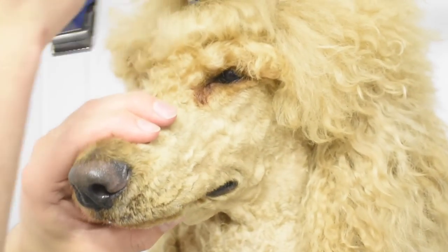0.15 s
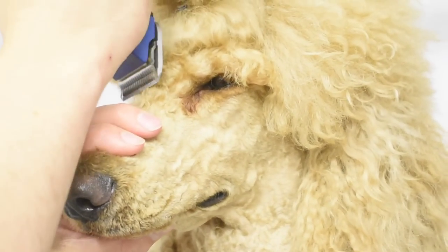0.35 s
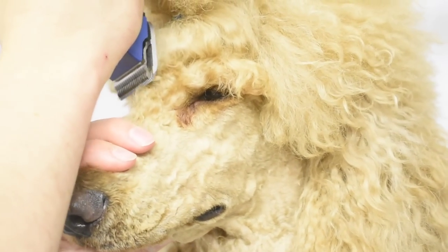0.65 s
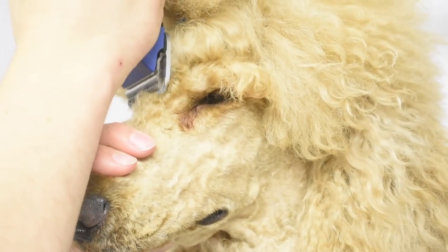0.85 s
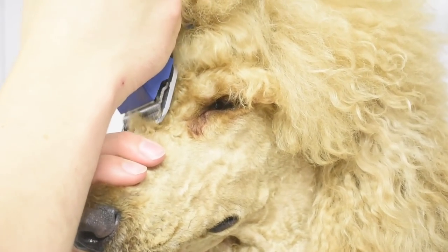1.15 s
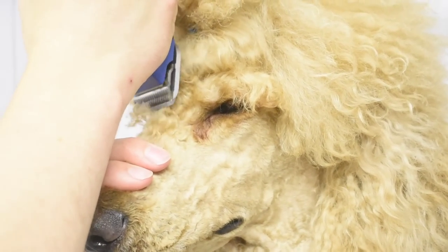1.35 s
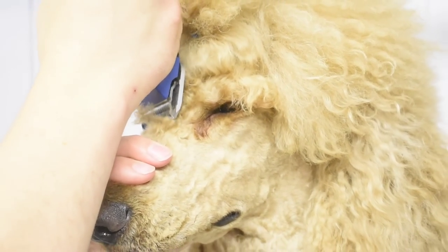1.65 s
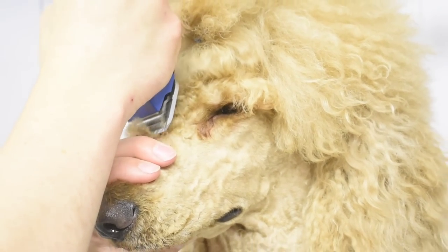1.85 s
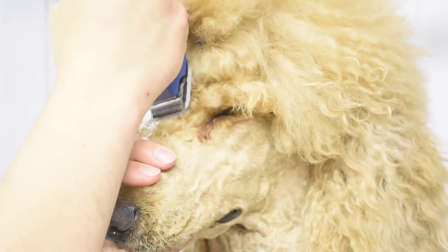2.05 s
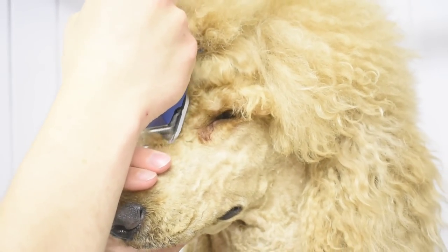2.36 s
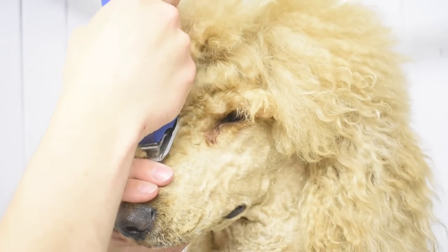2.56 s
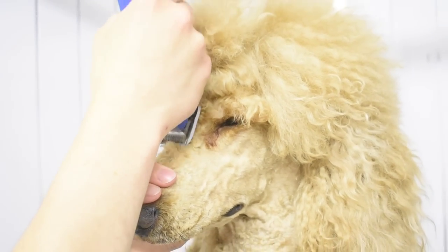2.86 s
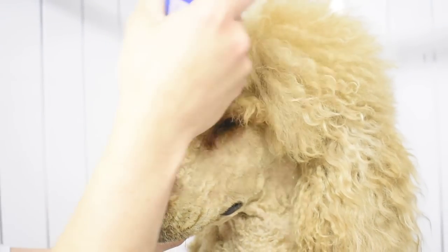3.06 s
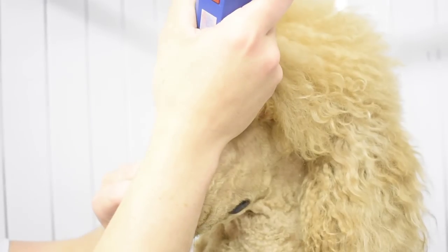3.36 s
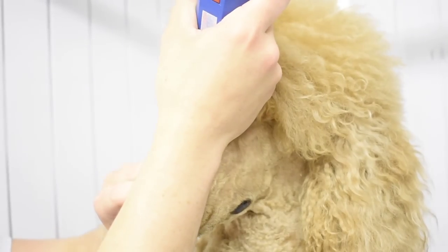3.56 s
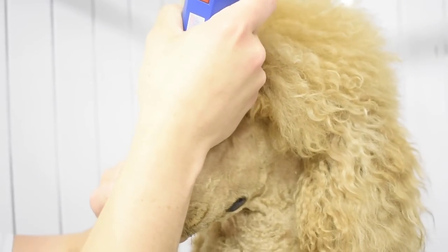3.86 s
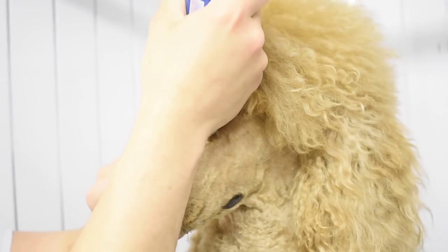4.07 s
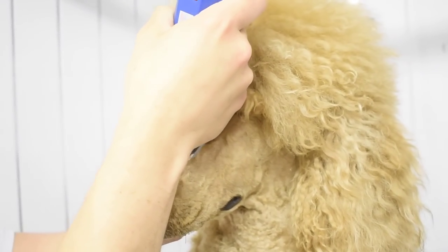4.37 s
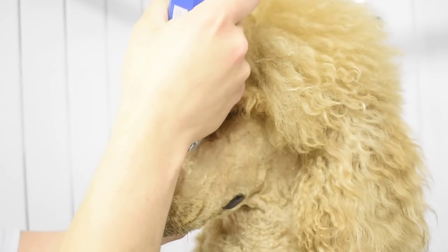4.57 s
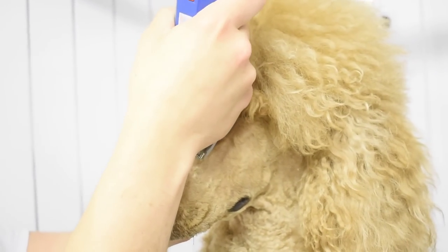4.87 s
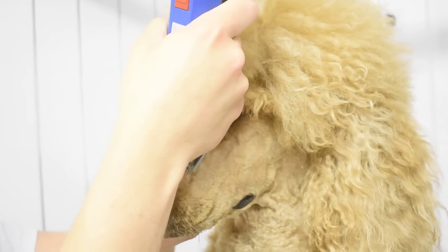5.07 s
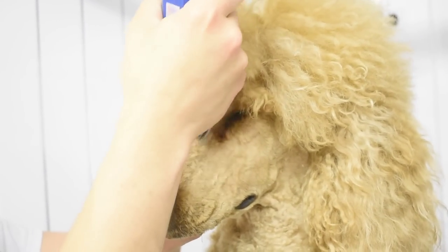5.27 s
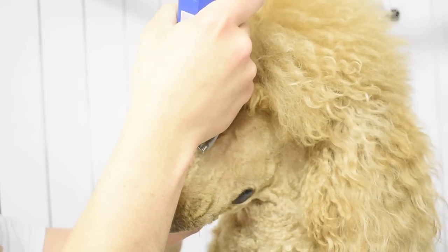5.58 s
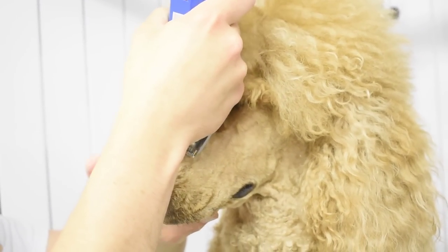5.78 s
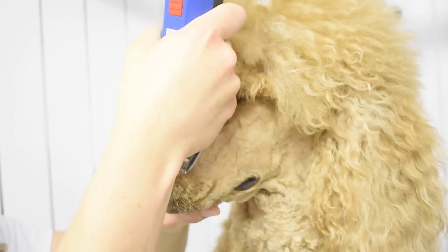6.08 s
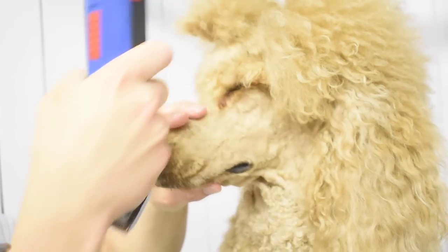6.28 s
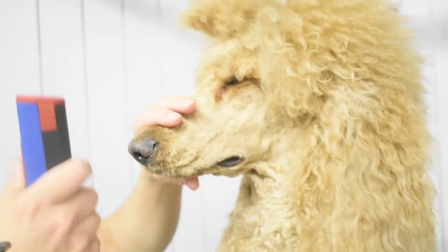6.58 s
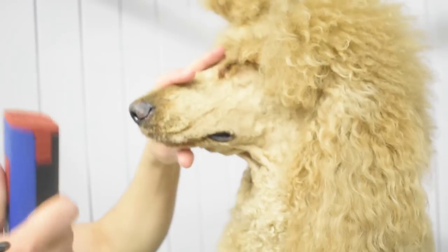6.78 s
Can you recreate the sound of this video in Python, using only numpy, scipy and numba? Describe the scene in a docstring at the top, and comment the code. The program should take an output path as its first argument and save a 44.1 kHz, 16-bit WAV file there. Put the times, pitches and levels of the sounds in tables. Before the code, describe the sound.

Steady harsh clipper buzz shifts slightly in colour as it trims a dog's fur, loosens when lifted away, and quickly stops, leaving faint room air.

```python
"""Cordless clippers trim a dog's face in a small bare room, are lifted away and switched off.
Each stroke is a train of impacts that excites the resonances of the plastic case; steel ticks, blade friction
and gear harmonics are added. The colour follows the grip: held free, at the brow or along the muzzle.
Near the start something bumps, probably the grooming table: damped modes, a noise rattle and a crack.
Behind lie steady room air and a soft low rumble, both filtered noise."""
import sys
import numpy as np
from scipy import signal
from scipy.fft import rfft, irfft
from scipy.io import wavfile
from scipy.ndimage import uniform_filter1d, map_coordinates
from numba import njit

SR = 44100
rng = np.random.default_rng(int(sys.argv[2]) if len(sys.argv) > 2 else 0)


def master_out(mix):
    """Clip the mix to full scale and print it as 16-bit PCM to the path in sys.argv[1]."""
    frames = np.transpose(np.atleast_2d(mix))
    ceiling = np.clip(frames, -1, 1)
    pcm = np.round(ceiling * 32767).astype(np.int16)
    wavfile.write(sys.argv[1], SR, pcm)


N = 305416
TIME = np.arange(N) / SR   # s
GEAR_RATIO = 9 / 11   # turns of the slow gear per turn of the crank; one crank turn is one blade stroke
# Contacts within one stroke. Each row: place as a share of the turn, relative level in dB of the knock
# on the case, relative level in dB of the steel tick.
CONTACTS = [(.004, -0.5, 7), (0.056, -17.5, -6), (0.128, -11, -7), (0.217, -8.5, 1.5), (0.287, -10.5, -7),
            (0.346, -10, 2), (0.504, -5.5, -17), (0.561, -6.5, -1.5), (0.692, -11, -22), (.78, -3.5, -30)]


def from_db(db):
    """Level to amplitude: 20 dB is a factor of ten."""
    return 10 ** (np.asarray(db) / 20)


def rms_one(x):
    """Normalise the effective (root-mean-square) value to 1."""
    return x / np.sqrt(np.mean(x ** 2) + 1e-20)


def steady(x):
    """Automatic levelling: divide by the effective value averaged over about four strokes."""
    power = uniform_filter1d(x ** 2, size=4300)
    return x / np.sqrt(power + .03 * power.mean())


def in_time(rows):
    """Linear interpolation of every column of a time curve at each sample."""
    s, *columns = np.transpose(rows)
    return [np.interp(TIME, s, column) for column in columns]


def at_hz(points, hz):
    """Interpolation of a spectrum along a logarithmic frequency axis."""
    known_hz, values = np.transpose(points)
    return np.interp(np.log(np.maximum(hz, 1)), np.log(known_hz), values)


def by_pose(values, poses):
    """Power-weighted mean of one value per pose (free, brow, muzzle) as the grip changes."""
    return np.dot(values, poses ** 2) / np.sum(poses ** 2, axis=0)


def drift(rate):
    """Smooth random motion: a cubic spline through `rate` normal deviates a second."""
    coarse = TIME[::256]
    points = rng.standard_normal(500)
    return np.interp(TIME, coarse, map_coordinates(points, [coarse * rate + 2], order=3, mode="wrap"))


def band(x, low_hz, high_hz):
    """Butterworth band-pass: a maximally flat passband."""
    edges_hz = [low_hz, min(high_hz, .45 * SR)]
    return signal.sosfilt(signal.butter(2, edges_hz, "band", fs=SR, output="sos"), x)


def colour(x, spectrum, size=4096):
    """Minimum-phase filtering: folding the cepstrum makes the given spectrum causal."""
    level_db = at_hz(spectrum, np.fft.rfftfreq(size, 1 / SR))
    cepstrum = irfft(np.log(from_db(level_db)))
    cepstrum[1:size // 2] *= 2
    cepstrum[size // 2 + 1:] = 0
    return signal.oaconvolve(x, irfft(np.exp(rfft(cepstrum))))[:N]


def resonate(x, hz, width_hz, lift_db):
    """Two-pole resonance added in parallel, which lifts (or lowers) one band."""
    return x + (from_db(lift_db) - 1) * signal.lfilter(*signal.iirpeak(hz, hz / width_hz, fs=SR), x)


def ring(x, hz, t60):
    """Damped free vibration: a unit click starts a sine of height 1 that falls 60 dB in t60 seconds."""
    r = .001 ** (1 / (t60 * SR))
    w = 2 * np.pi * hz / SR
    return signal.lfilter([0, np.sin(w)], [1, -2 * r * np.cos(w), r * r], x + 1e-18)


def clicks(times, sizes):
    """Band-limited impulses: a short windowed sinc places each one between samples."""
    at = np.ravel(times)[:, None] * SR
    taps = np.floor(at).astype(int) + np.arange(-3, 5)
    shape = np.sinc(taps - at) * np.sinc((taps - at) / 4)
    inside = (taps >= 0) & (taps < N)
    return np.bincount(taps[inside], (np.ravel(sizes)[:, None] * shape)[inside], N)


def tone(turns, level_db, waver_db, wander):
    """A partial with slow amplitude and phase modulation as the hand moves; wander in radians."""
    amplitude = np.sqrt(2) * from_db(level_db + waver_db * drift(6))
    return amplitude * np.cos(2 * np.pi * turns + wander * drift(9))


def room(x, wet_db):
    """Diffuse reverberation: decaying noise, band by band, joins the direct sound and power is kept."""
    # Each row: frequency in Hz, reverberation time (60 dB decay) in seconds.
    decay_times = [(100, 0.82), (500, 0.68), (3000, 0.4), (8000, 0.45), (16000, 0.079)]
    t = TIME[:SR // 2]
    edges_hz = np.geomspace(50, 18000, num=10)
    tail = 0
    for low_hz, high_hz in zip(edges_hz, edges_hz[1:]):
        decay_db = -60 * t / at_hz(decay_times, np.sqrt(low_hz * high_hz))
        tail = tail + band(rng.standard_normal(len(t)), low_hz, high_hz) * from_db(decay_db)
    tail = tail * np.clip(t / 0.0025 - 1, 0, 1)   # silent for 2.5 ms, then fading in over 2.5 ms
    wet = from_db(wet_db)
    return (x + wet * signal.oaconvolve(x, tail / np.linalg.norm(tail))[:N]) / np.hypot(1, wet)


def room_air():
    """Stationary broadband noise: white noise shaped by a fixed spectrum."""
    # Each row: frequency in Hz, relative spectral density in dB per Hz.
    air_spectrum = [(20, -22), (45, -23), (85, -2), (120, -3), (160, 2), (200, -5.5), (280, -4.5),
                    (450, -4.5), (1000, -0.5), (4000, -20), (16000, -42)]
    return from_db(-55.5) * rms_one(colour(rng.standard_normal(N), air_spectrum))


def low_rumble(floor_db=-62):
    """Amplitude-modulated narrow-band noise: the powers of a floor and of Gaussian swells add."""
    # Each row: time of the top in seconds, half length in seconds (fall to 1/e in power), level in dB.
    swells = [(1.871, 0.39, -52.5), (4.27, 0.18, -50), (4.967, 0.09, -54), (6.65, 0.24, -55.5)]
    power = from_db(floor_db) ** 2
    for s, half_s, db in swells:
        power = power + from_db(db) ** 2 * np.exp(-((TIME - s) / half_s) ** 2)
    return np.sqrt(power) * rms_one(band(rng.standard_normal(N), 242, 360))


def table_bump(rattle_db=-20, rattle_s=0.046):
    """Modal excitation: a sharp crack sets the modes of a hollow board booming, and it rattles."""
    # Each row: start in seconds, level in dB of the thud, level in dB of the crack before filtering.
    bumps = [(0.2113, -27, 1), (0.2276, -21.5, -7)]
    # Modes of the table. Each row: frequency in Hz, relative level in dB, 60 dB decay time in seconds.
    modes = [(84.5, -15.5, 1), (160.4, -6, 0.27), (220, 0, 0.44), (237, 1.5, 0.32), (315, -6.5, 0.2),
             (344, -4, 0.21), (402, -1, 0.41), (556, -8, 0.3), (712, -2, 0.24)]
    # Rattle of the table top. Each row: frequency in Hz, relative spectral density in dB per Hz.
    thud_spectrum = [(30, -23), (70, -25), (120, -13), (220, -1), (400, 1.5), (520, -12), (750, -11),
                     (1400, -7), (4000, -56)]
    s, thud_db, crack_db = np.transpose(bumps)
    blows = clicks(s, from_db(thud_db))
    boom = 0
    for k, (hz, db, t60) in enumerate(modes):
        boom = boom + (-1) ** k * from_db(db) * ring(blows, hz, t60)   # modes alternate in sign
    age = np.maximum(TIME - s[0], 0)
    envelope = np.exp(-age / rattle_s) * (1 - np.exp(-age / 0.0019))
    rattle = rms_one(colour(rng.standard_normal(N), thud_spectrum)) * envelope
    crack = 2 * band(clicks(s, from_db(crack_db)), 1500, 9700)
    return band(boom, 118, 4000) + from_db(rattle_db) * rattle + crack


def gear_whine(turns, poses, clatter_db, whine_db=0.56):
    """Gear-mesh harmonics: tones at multiples of the crank and slow-gear speeds follow pose and strain."""
    # Each row: multiple of the crank's speed, relative level in dB held free, at the brow and along the
    # muzzle, dB gained per dB of clatter, waver in dB, phase wander in radians.
    gear_tones = [(14 * GEAR_RATIO, -56, -54, -54, 0, .5, .1),
                  (42 * GEAR_RATIO, -47, -46, -41, -.4, 2.2, .7), (84, -40.5, -44, -39.5, 1.7, 2.6, 1.0),
                  (126, -45, -43, -42, .8, 2.2, 2)]
    strain_db = clatter_db - clatter_db.mean()
    whine = 0
    for multiple, *levels_db, follows, waver_db, wander in gear_tones:
        level_db = whine_db + by_pose(levels_db, poses) + follows * strain_db
        whine = whine + tone(multiple * turns, level_db, waver_db, wander)
    return whine


def blade_slide(turns, clatter_db, throb_db=1.66):
    """Friction noise: the blade rubs over its comb and through the fur, in two puffs a stroke."""
    # Each row: frequency in Hz, relative spectral density in dB per Hz.
    slide_spectrum = [(150, -28.5), (400, -20), (620, -4), (1000, -4.5), (2300, 5), (4500, -0.5),
                      (6000, -5), (8500, -8), (12000, -12.5), (16000, -27.5)]
    rub = rng.standard_normal(N) * from_db(throb_db * np.cos(4 * np.pi * (turns - .07)))
    return from_db(clatter_db - 3.5) * rms_one(colour(rub, slide_spectrum))


def end_stops(turns, clatter_db, snap_s=0.00029, uneven_db=2.5):
    """Backlash impact: the drive peg snaps across its slot each time the blade reverses."""
    reversals = np.arange(580) / 2 + .004   # in turns, two a stroke
    times = np.interp(reversals, turns, TIME, left=-1, right=-1)
    blows = clicks(times, from_db(uneven_db * rng.uniform(-0.76, 1, len(times))))
    envelope = signal.lfilter([1], [1, -np.exp(-1 / (snap_s * SR))], blows + 1e-18)
    snaps = envelope * rng.standard_normal(N)
    return from_db(clatter_db - 8.5) * rms_one(band(snaps, 3400, 5200))


def contact_times(turns, jitter_s):
    """Kinematics of the crank: when each contact falls (strokes x contacts), and its angle in turns."""
    angle = np.arange(-1, 290)[:, None] + np.array(CONTACTS)[:, 0]
    times = np.interp(angle, turns, TIME, left=-1, right=-1)
    return times + jitter_s * rng.standard_normal(angle.shape), angle


def tick_force(ring_db, clatter_db, free):
    """Impact level grows with vibration: the harder the clippers rattle, the harder the ticks, in dB."""
    usual_db, per_ring, per_clatter = -36, 0.72, 0.89   # dB; dB gained per dB of case ring and of clatter
    free_db = -2   # with no fur between the teeth they tick more softly
    rattle_db = per_ring * (ring_db - ring_db.mean()) + per_clatter * (clatter_db - clatter_db.mean())
    return usual_db + rattle_db + free_db * free


def blade_ticks(turns, force_db, beat_db=8.5, worst_turn=0.8, uneven_db=3.0, jitter_s=.00008,
                scrape_s=0.00035, sizzle_s=0.0013, sizzle_db=-15):
    """Beating of two rotations: steel strikes hardest when crank and slow gear align, some 7 times a second."""
    # Each row: frequency in Hz, relative spectral density in dB per Hz.
    tick_spectrum = [(2000, -28), (4000, 1), (6500, 0), (8500, -1), (10000, 2.5), (13000, 2), (16000, -12)]
    times, angle = contact_times(turns, jitter_s)
    lined_up = np.cos(2 * np.pi * (angle * (1 - GEAR_RATIO) + worst_turn - .25))
    chance_db = uneven_db * rng.standard_normal(times.shape)
    sizes = from_db(np.array(CONTACTS)[:, 2] + beat_db * lined_up + chance_db)
    # each tick is a brief scrape of the teeth with a short sizzle after it
    age = TIME[:SR // 32]
    shape = np.exp(-age / scrape_s) + from_db(sizzle_db) * np.exp(-age / sizzle_s)
    scrape = signal.oaconvolve(clicks(times, sizes), shape)[:N] * rng.standard_normal(N)
    return from_db(force_db) * rms_one(colour(scrape, tick_spectrum))


def case_tones(turns, poses, ring_db, lag_turn=0.0609):
    """Phase-locked harmonics: the shell's partials peak together just after the knocks, in bursts."""
    # Each row: multiple of the stroke rate, relative level in dB held free, at the brow, along the muzzle.
    singing = [(10, -66, -62, -60), (13, -58, -59, -62), (15, -79, -60, -58), (26, -74, -57, -55),
               (28, -63, -59, -52), (31, -54, -54, -55), (38, -49, -48, -46), (40, -40, -43, -46),
               (42, -34, -42, -43), (44, -47, -40, -51), (48, -53, -47, -41), (50, -46, -33, -45),
               (51, -56, -38, -41), (52, -49, -37, -41), (53, -54, -44, -38), (54, -46, -33, -39),
               (55, -51, -45, -44), (56, -42, -48, -39), (57, -58, -43, -35), (58, -41, -47, -38),
               (59, -43, -39, -34), (60, -45, -40, -38), (61, -40, -38, -36), (62, -44, -40, -38),
               (65, -49, -40, -36), (69, -41, -43, -45), (71, -43, -41, -43), (73, -48, -40, -45),
               (75, -44, -42, -58)]
    tones = 0
    for multiple, *levels_db in singing:
        level_db = by_pose(levels_db, poses)
        tones = tones + tone(multiple * (turns - lag_turn), level_db, waver_db=2.0, wander=.4)
    return tones * from_db(.8 * (ring_db - np.median(ring_db)) - .6)


def disperse(x, width_hz=380):
    """Dispersion of bending waves in the shell: all-pass filters smear each knock around 2 kHz."""
    for hz in np.geomspace(1800, 2500, num=3):
        x = x - 2 * signal.lfilter(*signal.iirpeak(hz, hz / width_hz, fs=SR), x)
    return x


def case_rattle(turns, poses, ring_db, clatter_db, jitter_s=.000024, loose_s=.00005, uneven_db=1.6):
    """Forced resonance: near-periodic knocks ring the plastic case; an unloaded blade chatters loosely."""
    # Broad colour of the knocks. Each row: frequency in Hz, relative spectral density in dB per Hz.
    case_spectrum = [(130, -44), (300, -17), (600, -26), (1000, -22), (1450, -9), (2000, -7.5),
                     (3000, -0.5), (4000, -1.5), (5000, -8.5), (5900, -18), (8000, -10), (10000, -21.5),
                     (13000, -30), (16000, -30.5)]
    # Each row: frequency in Hz, width in Hz, lift in dB held free, at the brow and along the muzzle.
    resonances = [(847, 63, 20, 15, 12.5), (1080, 180, -9, 10.5, 0), (1690, 140, 10, -4, 0.5),
                  (2090, 133, -2.5, 13, 6), (2434, 91, -2, 7.5, 17), (2784, 700, 2, 9, 4),
                  (3380, 290, 8.5, -2.5, 5.5), (3930, 280, 1, 3.5, 6), (4780, 250, 7, 9.5, -2),
                  (5250, 204, 14.5, 10, 12.5), (6830, 410, 12.5, 6.5, 7), (8300, 2300, 9, 9.5, 3.5)]
    times, _ = contact_times(turns, jitter_s)
    looseness_s = loose_s * np.interp(times, TIME, poses[0])
    times = times + looseness_s * rng.standard_normal(times.shape)
    sizes_db = np.array(CONTACTS)[:, 1] + uneven_db * rng.standard_normal(times.shape)
    knocks = disperse(colour(clicks(times, from_db(sizes_db)), case_spectrum))
    rattle = 0
    for k, share in enumerate(poses):
        voiced = room(knocks, wet_db=3)   # every pose has its own paths through the room
        for hz, width_hz, *lifts_db in resonances:
            voiced = resonate(voiced, hz, width_hz, lifts_db[k])
        rattle = rattle + share * rms_one(voiced)
    # the main ring around 2.3 kHz and the clatter that remains are levelled apart
    main = signal.lfilter(*signal.iirpeak(2330, 2.5, fs=SR), rattle)
    clatter = steady(rattle - main) * from_db(clatter_db - 2.5)
    return steady(main) * from_db(ring_db - 3.0 + 5.6 * poses[0]) + clatter


@njit
def moving_band(x, w, damping):
    """State-variable band-pass whose centre w (radians per sample) glides; gain about 1 at the top."""
    out, low, mid = np.zeros(len(x)), 0., 0.
    for i in range(len(x)):
        low += w[i] * mid
        mid += w[i] * (x[i] - low - damping * mid)
        out[i] = damping * mid
    return out


def hand_hollow(x, poses, damping=.09):
    """Cavity resonance: the gap under the hand lifts a band that rises in pitch as the blade leaves the fur."""
    # Hollow between blade, hand and fur; rows held free, at the brow, along the muzzle.
    # Each row: frequency in Hz, lift in dB before the half-lifted gain below.
    hollows = [(2940, 5), (2000, 1.5), (2350, 2)]
    half_lifted_db = 5.5   # the hollow rings most while the blade is just off the fur
    sway_hz, sways_per_s = 180, 12   # in the air the hand is unsteady, and the pitch of the hollow sways
    hollow_hz, lift_db = by_pose(np.transpose(hollows), poses)
    free = poses[0] ** 2
    hollow_hz = hollow_hz + sway_hz * free ** 2 * drift(sways_per_s)
    lift_db = lift_db + half_lifted_db * np.sin(np.pi * free)
    lifted = x + (from_db(lift_db) - 1) * moving_band(x, 2 * np.pi * hollow_hz / SR, damping)
    return lifted * from_db(-.3 * lift_db)   # offsets part of the added power


def clippers():
    """Superposition of case, blade and gears on one crank angle; after switch-off all decays exponentially."""
    # Motor speed. Each row: time in seconds, blade strokes per second while switched on.
    speed = [(0.0, 40.947), (0.5, 40.84), (0.9, 41.049), (1.6, 40.945), (2.6, 41.019), (3.4, 41.091),
             (4.0, 40.972), (5.0, 41.079), (5.9, 41.104), (6.7, 41.04)]
    # Rattle. Each row: time in seconds, base level in dB of the case ring, base level in dB of the clatter.
    drive = [(0.0, -26.5, -24.5), (0.2, -26, -24), (0.32, -26.5, -25.5), (0.86, -28.5, -27.5),
             (1.14, -26.5, -27), (2.11, -26.5, -26.5), (2.5, -25, -27.5), (3.26, -24, -24),
             (3.4, -26.5, -24.5), (4.37, -25, -26), (5.91, -29, -26), (6.27, -25, -25.5), (6.36, -28, -25),
             (6.7, -27, -26.5)]
    # Grip; the rest is upright along the muzzle.
    # Each row: time in seconds, share held free, share with the blade at the brow.
    grip = [(0, 0.0052, 0.67), (.19, 0.28, 0), (.28, 0.23, 0.41), (.4, 0.025, 1), (2.4, 0, 0.78),
            (2.65, 0.031, 0.57), (3.0, 0, 0.11), (3.13, 0.04, 0.1), (6.0, 0.022, 0.096), (6.21, .05, 0.36),
            (6.34, 0.85, 0.02)]
    first_turn, off_s = -.429, 6.715   # starting crank angle in turns; moment of switch-off in s
    coast_s, tones_die_s, rattle_dies_s = .45, 0.046, 0.057   # time constants after switch-off
    since_off = np.maximum(TIME - off_s, 0)
    strokes_per_s = in_time(speed)[0] * np.exp(-since_off / coast_s)
    turns = first_turn + np.cumsum(strokes_per_s) / SR
    running = np.exp(-since_off / tones_die_s)
    fade = np.exp(-since_off / rattle_dies_s)
    ring_db, clatter_db = in_time(drive)
    free, brow = np.clip(in_time(grip), 0, 1)
    poses = np.sqrt([free, brow, np.clip(1 - free - brow, 0, 1)])   # amplitudes; the squares are shares

    shell = case_rattle(turns, poses, ring_db, clatter_db) * fade
    shell = shell + case_tones(turns, poses, ring_db) * running
    ticks = blade_ticks(turns, tick_force(ring_db, clatter_db, free)) * running
    blade = (blade_slide(turns, clatter_db) + end_stops(turns, clatter_db)) * fade + room(ticks, wet_db=-4)
    return hand_hollow(shell, poses) + blade + gear_whine(turns, poses, clatter_db) * running


def scene():
    """Linear superposition of the clippers, the bump in the room, the air and the rumble."""
    return (clippers() + room(table_bump(), wet_db=-17.0) + room_air() + low_rumble())[None]


def record(dry):
    """Elliptic low-pass: the top is cut steeply above 15.9 kHz."""
    return signal.sosfilt(signal.ellip(10, .2, 80, 15900, fs=SR, output="sos"), dry)


dry = scene()
out = record(dry)
master_out(out)
```